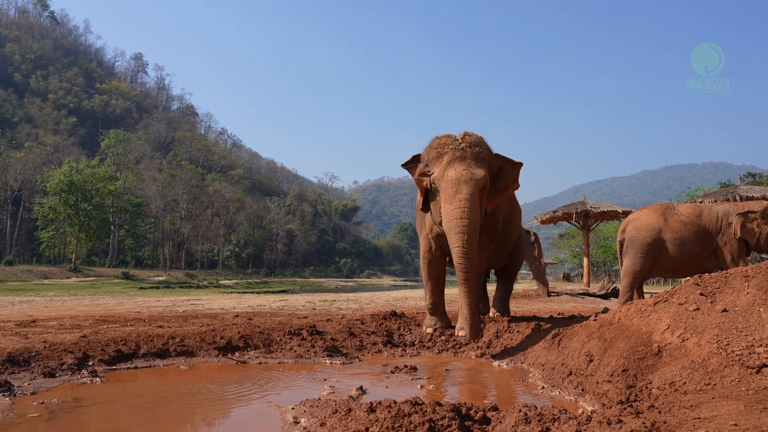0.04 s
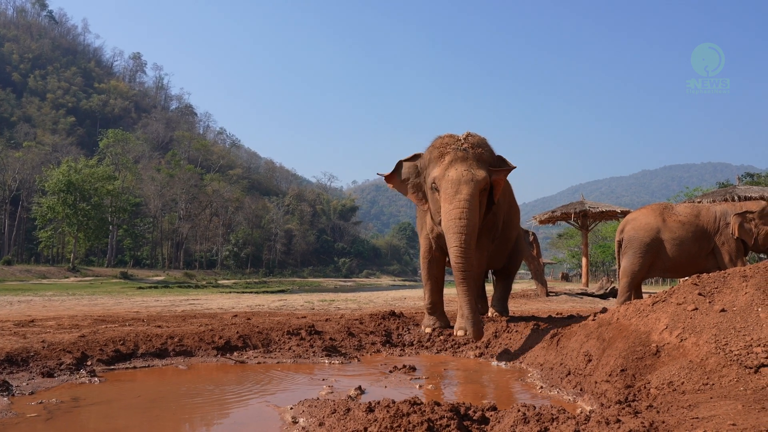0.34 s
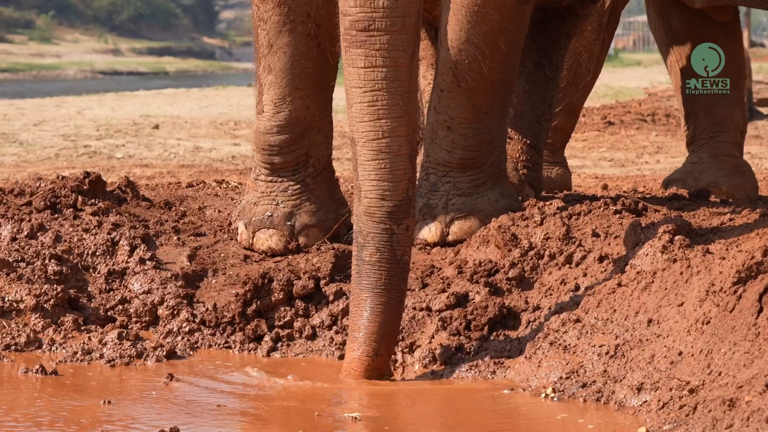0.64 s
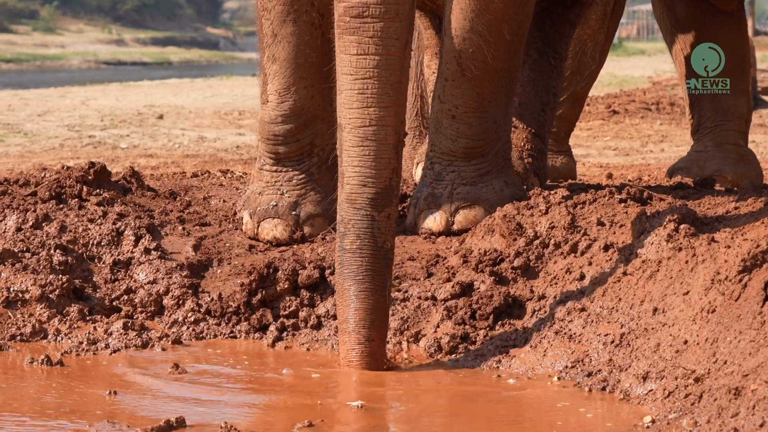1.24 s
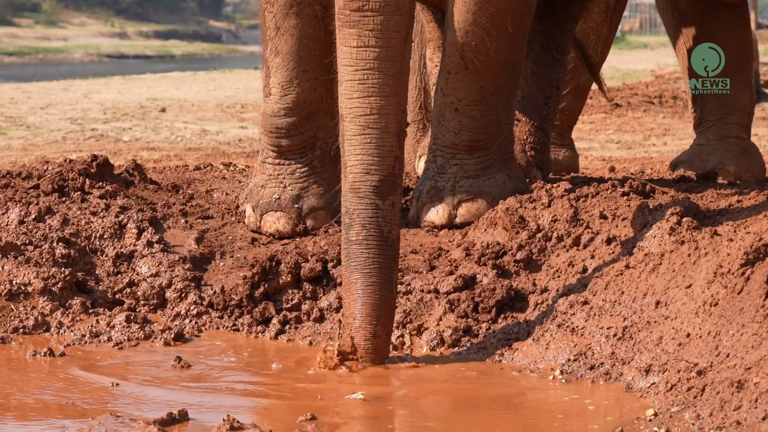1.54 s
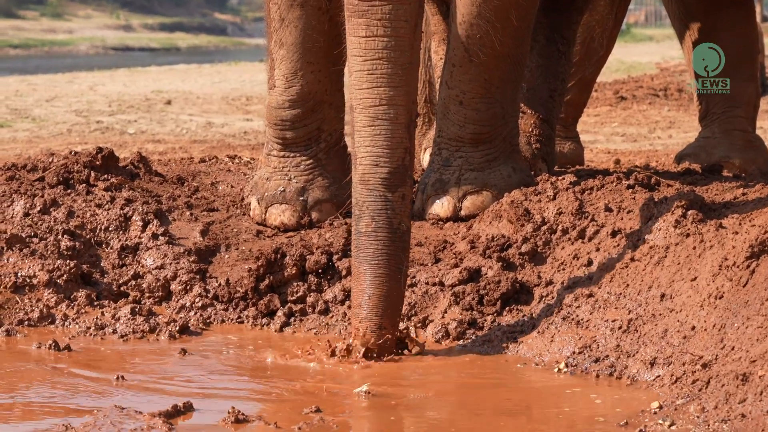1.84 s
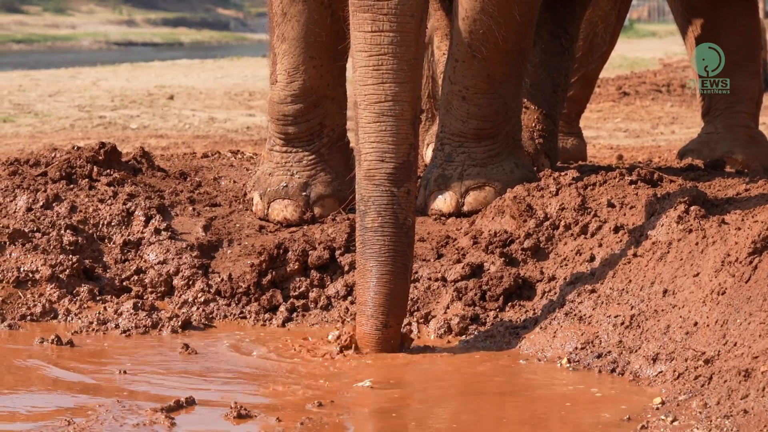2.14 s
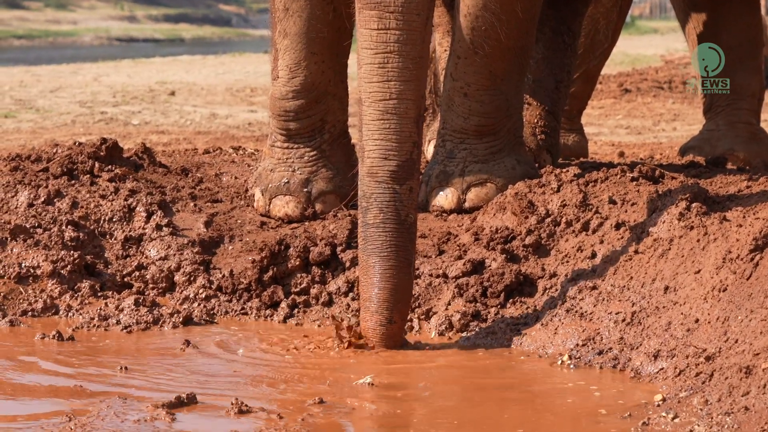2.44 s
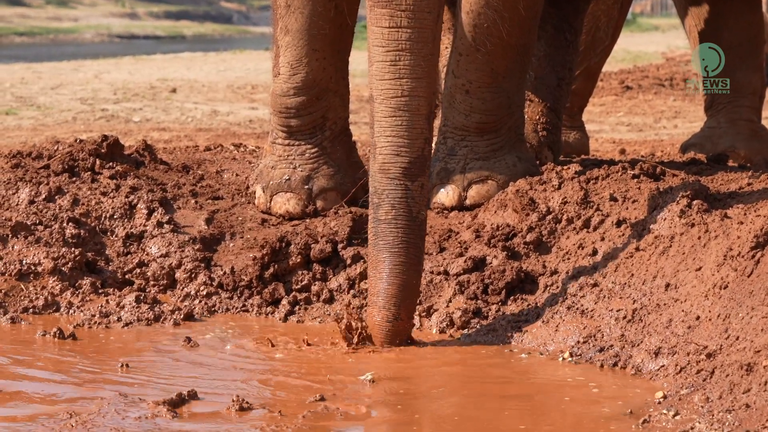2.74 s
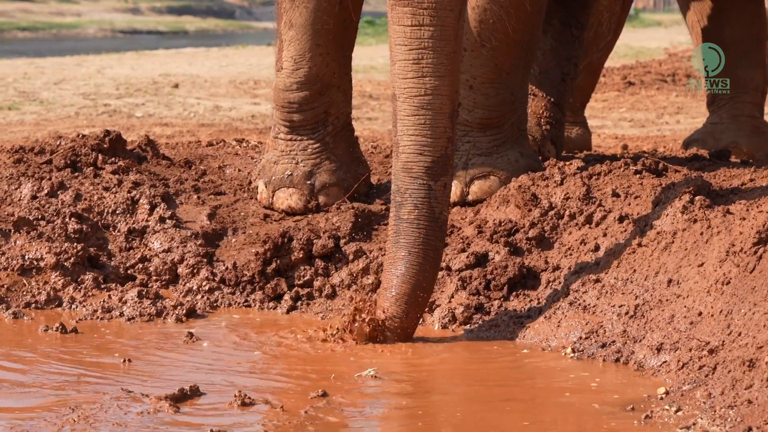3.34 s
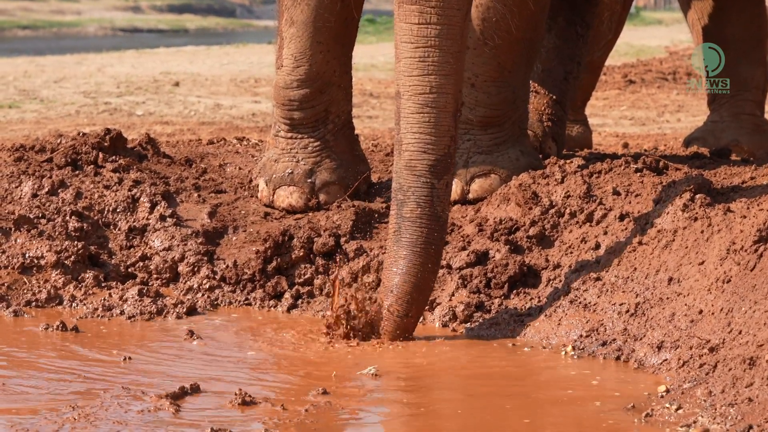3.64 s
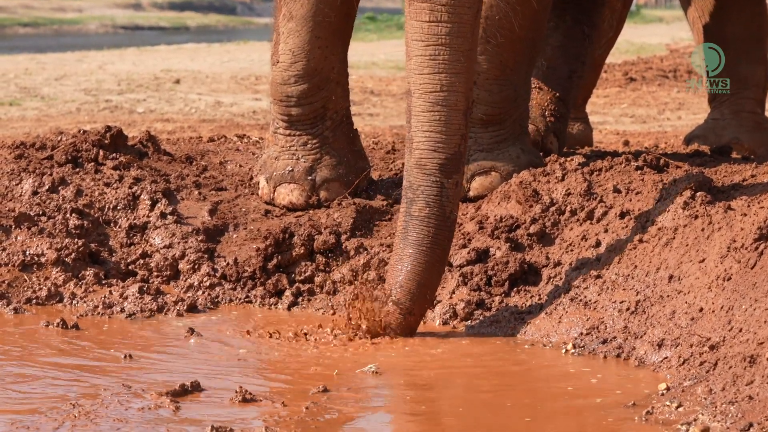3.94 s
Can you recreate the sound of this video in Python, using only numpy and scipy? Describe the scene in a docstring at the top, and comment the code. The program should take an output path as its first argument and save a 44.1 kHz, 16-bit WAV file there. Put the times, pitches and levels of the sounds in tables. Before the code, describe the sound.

Muddy water bubbles and gurgles as an elephant blows through its dipped trunk outdoors.

```python
"""At a muddy pool in the open, an elephant blows through its dipped trunk. The air comes up in gulps,
about nine a second, each a cluster of big bubbles. The trunk's air column gurgles below them, hollows
slosh open and shut, mud snaps and thrown water spatters back. Wind buffets the microphone;
insects hiss in the background, and far off are a chirping bird and a low drone.
Early on an edit cut clicks: a hollow wash stops and the wind rumble is abruptly louder."""
import sys
import numpy as np
from scipy import signal
from scipy.fft import rfft, irfft
from scipy.io import wavfile
from scipy.ndimage import uniform_filter1d

SR = 44100
rng = np.random.default_rng(int(sys.argv[2]) if len(sys.argv) > 2 else 0)


def log_audio(samples):
    """Write samples as a 16-bit WAV file to the path given in sys.argv[1]."""
    # one column per channel
    frames = np.atleast_2d(samples).T
    # limit to full scale, then quantise
    limited = np.clip(frames, -1, 1)
    pcm = np.round(limited * 32767).astype(np.int16)
    wavfile.write(sys.argv[1], SR, pcm)


N = 176400
T = np.arange(N) / SR

# spectra of the open air and of the insect hiss: freq_hz, gain_db
AIR_SPECTRUM = [(200, 0.5), (600, -5), (1150, -13), (3200, -13), (3900, -18.5), (4600, -27), (15000, -38)]
INSECT_SPECTRUM = [(4400, -61), (5200, -16.5), (5700, -2.5), (6150, 1.5), (6700, -4), (7400, -16.5),
                   (8500, -49)]
# strength of the wind on the microphone: time_s, level_db
WIND_LEVEL = [(.47, -26), (.48, -16), (.73, -10.5), (1, -16), (1.75, -15), (1.92, -13), (2.15, -19.5),
              (2.65, -14), (2.97, -14.5), (3.08, -21), (4, -17.5)]
# spectrum of its buffeting: freq_hz, gain_db
WIND_SPECTRUM = [(10, -18.5), (22, 0), (32, -2), (62, -15.5), (90, -21), (150, -34), (500, -58),
                 (4000, -96)]
# notes of the far bird: start_s, pitch_hz, level_db
BIRD_NOTES = [(0.052, 3180, -37), (.08, 2570, -40), (0.12, 2835, -35.5), (0.243, 3116, -35),
              (0.273, 2980, -36.5), (0.31, 2860, -35), (0.339, 2867, -34.5), (0.454, 3106, -35.5),
              (.835, 3200, -42), (0.877, 3140, -40), (0.901, 2550, -45)]
# wet snaps of mud and drops: start_s, peak_db, pitch_hz
MUD_SNAPS = [(.075, -37.5, 10500), (0.1127, -22.5, 3030), (.198, -38, 7700), (0.553, -28, 2200),
             (0.577, -23.5, 3520), (1.9634, -33, 8100), (2.0444, -14.5, 2980), (2.046, -40, 9000),
             (2.2, -22.5, 2430), (2.2114, -34, 7600), (2.547, -21, 3500)]
# water thrown up and falling back: time_s, level_db
SPLASH_LEVEL = [(1.07, -64), (1.11, -39.5), (1.18, -34), (1.32, -30.5), (1.412, -40.5), (1.436, -28),
                (1.48, -36.5), (1.6, -31.5), (1.64, -35), (1.71, -30.5), (1.94, -33), (2.27, -36.5),
                (2.36, -30.5), (2.41, -38), (2.45, -31), (2.55, -30.5), (2.61, -39), (2.74, -36.5),
                (2.92, -32.5), (3.13, -31.5), (3.27, -29.5), (3.43, -28.5), (3.5, -33), (3.56, -29.5),
                (3.6, -35), (3.66, -28.5), (3.78, -31), (4, -29)]
# fine spray against the thrown water: time_s, relative_db
SPRAY_BALANCE = [(1.33, -10), (1.42, -15), (2.8, -18), (3.4, -14.5), (4, -16)]
# filters on the churning water and on the spray: freq_hz, gain_db
CHURN_FILTER = [(450, -8), (880, 3.5), (1250, -3.5), (2000, -3.5), (3000, 0.5), (3750, -4.5), (4500, -15.5),
                (8000, -49)]
SPRAY_FILTER = [(1000, -55), (3500, 13), (6000, 4), (12000, -4.5), (15500, -12)]
# hollows in the water opening or closing: start_s, length_s, level_db, first_pitch_hz, last_pitch_hz
WATER_HOLLOWS = [(1.49, 0.13, -33, 680, 1050), (1.698, 0.089, -34.5, 1480, 826),
                 (1.919, 0.041, -32, 330, 480), (2.513, 0.1, -32, 900, 1720),
                 (2.89, 0.07, -35.5, 770, 1420)]
# resonances of the trunk's air column: pitch_hz, stage_half_width_hz, gain_db
TRUNK_MODES = [(147, 15.5, 2.5), (194.4, 17.6, 2), (267.8, 13.7, 2.5), (319.6, 12, 0), (401.5, 28.5, -3.5)]
# loudness of the air column and of loose air pockets under the surface: time_s, level_db
COLUMN_LEVEL = [(1.07, -33), (1.23, -27), (1.55, -32), (2.65, -28.5), (2.72, -37), (2.8, -28), (4, -27.5)]
POCKET_LEVEL = [(1.1, -36.5), (2.5, -35.5), (2.9, -39)]
# gulps of air breaking the surface: start_s, length_s, level_db, pitch_hz
AIR_GULPS = [(1.092, 0.055, -38.5, 1008), (1.328, 0.088, -31.5, 339), (1.427, .027, -22.5, 716),
             (1.667, 0.063, -35, 793), (1.794, 0.075, -29.5, 843), (1.875, .06, -26, 763),
             (1.976, 0.11, -32, 882), (2.097, 0.054, -28, 376), (2.131, 0.029, -31.5, 1680),
             (2.186, .03, -30, 690), (2.205, .06, -28.5, 340), (2.348, .04, -31.5, 750),
             (2.429, 0.042, -26.5, 870), (2.533, 0.036, -29.5, 217), (2.635, 0.073, -30.5, 766),
             (2.748, 0.049, -26.5, 880), (2.875, 0.045, -28.5, 726), (2.969, 0.076, -31.5, 838),
             (3.078, .048, -29.5, 760), (3.178, 0.062, -36, 845), (3.238, 0.033, -31, 2160),
             (3.299, .06, -33.5, 963), (3.387, 0.055, -31, 825), (3.516, 0.071, -29.5, 840),
             (3.633, 0.039, -26, 890), (3.752, 0.033, -31, 812), (3.914, 0.033, -30.5, 2290),
             (3.978, 0.034, -33, 1000)]


def amp(db):
    """Decibels to gain."""
    return 10 ** (np.asarray(db) / 20)


def unit(x):
    """Scales to rms 1."""
    return x / np.sqrt(np.mean(x ** 2) + 1e-20)


def level(curve):
    """Gain over time from a (time_s, level_db) curve."""
    return amp(np.interp(T, *np.transpose(curve)))


def add(mix, start_s, sound):
    """Lays a sound into the mix, cut off at the mix's end."""
    part = mix[max(round(start_s * SR), 0):][:len(sound)]
    part += sound[:len(part)]


def colour(x, points):
    """Filters by a (freq_hz, gain_db) curve; rms 1."""
    points_hz, db = np.transpose(points)
    hz = np.fft.rfftfreq(N, 1 / SR)
    return unit(irfft(rfft(x) * amp(np.interp(np.log(hz + 1), np.log(points_hz), db)), N))


def drift(rate_hz):
    """Smooth random wandering, rms 1."""
    hz = np.fft.rfftfreq(N, 1 / SR)
    return unit(irfft(rfft(rng.standard_normal(N)) * np.exp(-(hz / rate_hz) ** 2), N))


def steady(x, span_s):
    """Evens out the slow swells of a random texture."""
    return x / np.sqrt(abs(uniform_filter1d(x ** 2, max(int(span_s * SR), 2))) + 1e-9)


def ring(x, hz, width_hz):
    """One resonance of gain 1, fixed or moving."""
    turn = np.exp(2j * np.pi * np.cumsum(hz * np.ones(len(x))) / SR)
    pole = np.exp(-np.pi * width_hz / SR)
    return 2 * (turn * signal.lfilter([1 - pole], [1, -pole], x / turn)).real


def hollow(x, hz, width_hz):
    """A steep-sided resonance: two stages, each width_hz wide."""
    return ring(ring(x, hz, width_hz), hz, width_hz)


def bubble(hz, cycles, rise):
    """A bubble swells within a cycle, rings down to 1/e in `cycles` and climbs in pitch."""
    age = np.arange(0, 6, hz / cycles / SR)  # in decay times
    envelope = (1 - np.exp(-2 * age * cycles)) * np.exp(-age)
    return envelope * np.sin(2 * np.pi * cycles * age * (1 + rise * age / 2))


def cloud(low_hz, high_hz, per_s, cycles, rise, spread_db, pitches=120):
    """Bubbles of many sizes at random moments, a few much louder than the rest."""
    out = np.zeros(N)
    per_pitch = int(per_s * N / SR / pitches)
    for hz in np.geomspace(low_hz, high_hz, pitches):
        pop = hz * bubble(hz, cycles * 2 ** (2 * rng.random() - 1), rise)
        when, strength, polarity = rng.random((300, 3))[:per_pitch].T
        gains = amp(spread_db * -np.log(strength + .02)) * np.sign(polarity - .5)
        for start_s, gain in zip(when * N / SR, gains):
            add(out, start_s, gain * pop)
    return unit(out)


def scatter(x, t60_s, wet_db):
    """Adds a thin outdoor tail from banks and trees."""
    t = np.arange(SR // 2) / SR
    echoes = rng.standard_normal(len(t)) * (rng.random(len(t)) < .05)
    tail = echoes * amp(-60 * t / t60_s) * (t > .003)
    return x + amp(wet_db) * signal.fftconvolve(x, tail / np.linalg.norm(tail))[:N]


def background(cut_s):
    """Open air, a band of insect hiss, a far low drone, and a hollow wash that stops at the edit cut."""
    air, insects, drone, wash = rng.standard_normal((4, N))
    hum = unit(hollow(drone, hz=101.8, width_hz=20.3))
    wash = unit(hollow(wash, hz=802, width_hz=190)) * (T < cut_s)
    hiss = colour(insects, INSECT_SPECTRUM) * amp(.5 * drift(40))
    return amp(-41.5) * colour(air, AIR_SPECTRUM) + amp(-48) * hiss + amp(-37) * hum + amp(-48.5) * wash


def bird(note_s=0.019, fall_hz_per_s=7400):
    """Short falling whistles from far off."""
    out, t = np.zeros(N), np.arange(0, note_s, 1 / SR)
    for start_s, hz, db in BIRD_NOTES:
        whistle = np.sin(2 * np.pi * np.cumsum(hz - fall_hz_per_s * t) / SR)
        add(out, start_s, amp(db) * np.sin(np.pi * t / note_s) * whistle)
    return out


def wind(cut_s):
    """Low buffeting right on the microphone; an edit cut clicks and the rumble is abruptly louder."""
    out = steady(colour(rng.standard_normal(N), WIND_SPECTRUM), 0.116) * level(WIND_LEVEL)
    click = -amp(-14.5) * np.exp(-T / 0.024)
    add(out, cut_s, click)
    return out


def snaps(decay_s=0.0052):
    """Mud and drops crack, each with one quickly damped ring."""
    out, t = np.zeros(N), T[:SR // 20]
    for start_s, db, hz in MUD_SNAPS:
        crack = rng.standard_normal(len(t)) * np.exp(-t / decay_s)
        body = ring(crack, hz, 0.3 * hz)
        snap = ring(body + 0.091 * crack, hz, 0.5 * hz)
        add(out, start_s, amp(db) * snap / abs(snap).max())
    return out


def splash():
    """Thrown water: a dense churn of small, quickly damped bubbles, and fine spray with it."""
    clumps = drift(53)
    churn = cloud(602.3, 5536, per_s=3000, cycles=6, rise=0.04, spread_db=3.24, pitches=200)
    churn = steady(colour(churn, CHURN_FILTER), 0.093) * amp(1.43 * clumps)
    spray = cloud(1750, 17400, per_s=4500, cycles=1.4, rise=0.026, spread_db=0.51)
    spray = steady(colour(spray, SPRAY_FILTER), 0.044) * amp(1.24 * clumps)
    return (churn + spray * level(SPRAY_BALANCE)) * level(SPLASH_LEVEL) * (T > SPLASH_LEVEL[0][0])


def sloshes():
    """Rushing water rings a hollow whose pitch glides as it changes size."""
    out = np.zeros(N)
    for start_s, length_s, db, first_hz, last_hz in WATER_HOLLOWS:
        progress = np.arange(0, length_s, 1 / SR) / length_s
        glide_hz = first_hz * (last_hz / first_hz) ** progress
        rush = hollow(rng.standard_normal(len(progress)), glide_hz, 0.29 * first_hz)
        add(out, start_s, amp(db) * unit(rush * np.sin(np.pi * progress) ** .5))
    return out


def gurgle(bubbling, gulp_drive=0.62):
    """Air tearing from the trunk tip rings its air column, harder at each gulp; air pockets wobble."""
    gulp_envelope = unit(np.sqrt(abs(uniform_filter1d(bubbling ** 2, SR // 20))))
    rush = rng.standard_normal(N)
    column = unit(sum((-1) ** k * amp(db) * hollow(rush, hz, 2 * half_width_hz)
                      for k, (hz, half_width_hz, db) in enumerate(TRUNK_MODES)))
    column = unit(steady(column, 0.072) * (1 + gulp_drive * gulp_envelope))
    pockets = cloud(146.6, 658, per_s=95, cycles=6.54, rise=0.0715, spread_db=2.2)
    pockets = steady(colour(pockets, [(140, 5), (400, -5.5), (620, -2)]), 0.18)
    return (column * level(COLUMN_LEVEL) + pockets * level(POCKET_LEVEL)) * (T > COLUMN_LEVEL[0][0])


def gulps(count=18, pitch_spread=0.28, lead_cycles=5.8, rise=0.03, slap_decay_s=0.02):
    """Each gulp is one leading bubble that bursts with a slap, in a quick cluster of others."""
    out, t = np.zeros(N), T[:SR // 20]
    for start_s, length_s, db, hz in AIR_GULPS:
        burst = np.zeros(SR // 2)
        for k, (jitter, detune, strength, polarity) in enumerate(rng.random((count, 4))):
            progress = (k + jitter) / count
            gain = np.sin(np.pi * progress ** 0.71) * (.5 + strength) * np.sign(polarity - .5)
            bubble_hz = hz * np.exp(pitch_spread * (2 * detune - 1))
            add(burst, progress * length_s, gain * bubble(bubble_hz, 0.54 * lead_cycles, rise))
        add(burst, 0.18 * length_s, 1.77 * bubble(hz, lead_cycles, rise))  # the leading bubble
        slap = unit(ring(rng.standard_normal(len(t)), 2 * hz, 3 * hz)) * np.exp(-t / slap_decay_s)
        add(burst, 0.22 * length_s, amp(-17) * ring(slap, 2 * hz, 2 * hz))
        add(out, start_s, amp(db) * burst * np.sqrt(length_s * SR / np.sum(burst ** 2)))
    return out


def scene(cut_s=0.4768):
    """One microphone: the pool almost dry, the far bird with a longer tail, wind and background."""
    bubbling = gulps()
    water = bubbling + sloshes() + gurgle(bubbling) + splash() + snaps()
    pool = scatter(water, t60_s=0.046, wet_db=-9.5)
    far_bird = scatter(bird(), t60_s=0.47, wet_db=-4)
    return (pool + far_bird + wind(cut_s) + background(cut_s))[None]


def record(dry, cutoff_hz=15750):
    """A steep low-pass takes off the highest treble."""
    lowpass = signal.firwin(511, cutoff_hz, window=("kaiser", 9), fs=SR)
    return signal.oaconvolve(dry, lowpass[None], "same")


dry = scene()
out = record(dry)
log_audio(out)
```